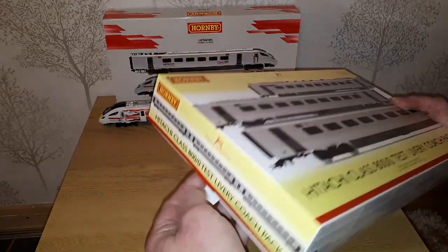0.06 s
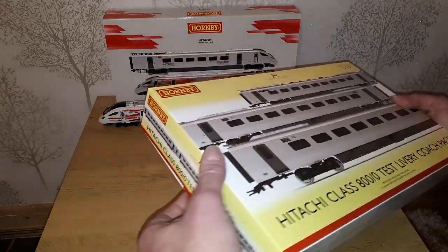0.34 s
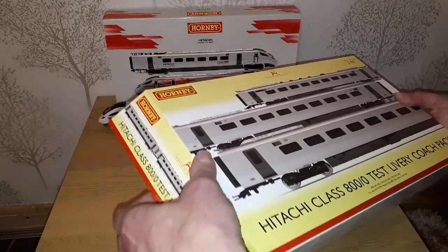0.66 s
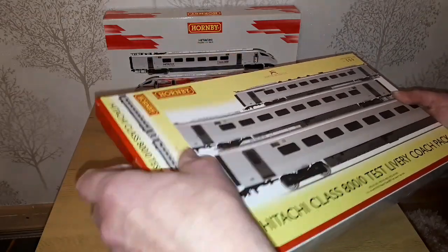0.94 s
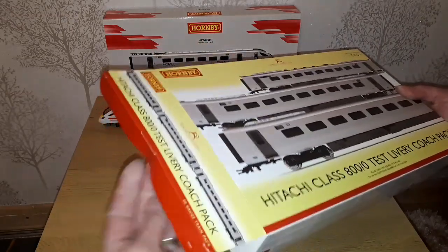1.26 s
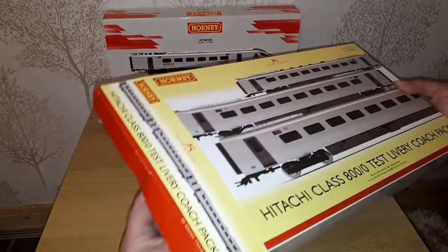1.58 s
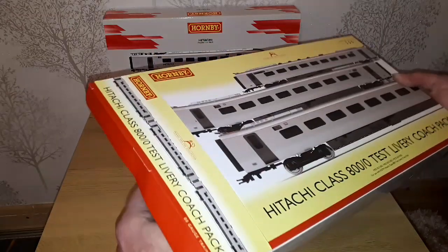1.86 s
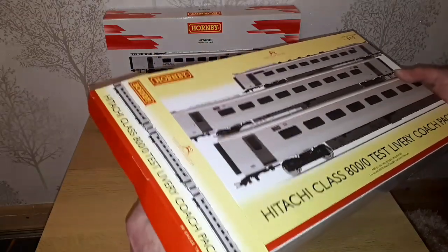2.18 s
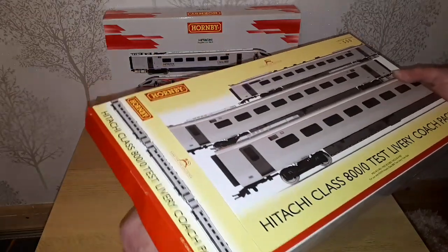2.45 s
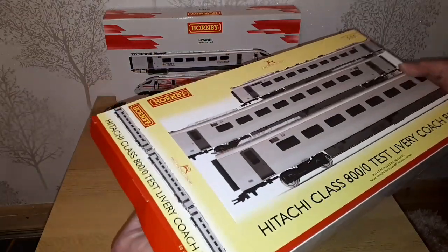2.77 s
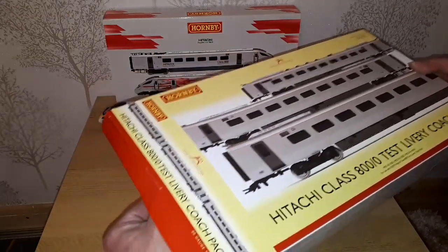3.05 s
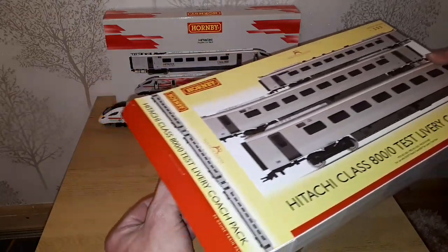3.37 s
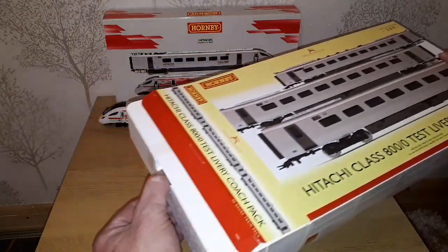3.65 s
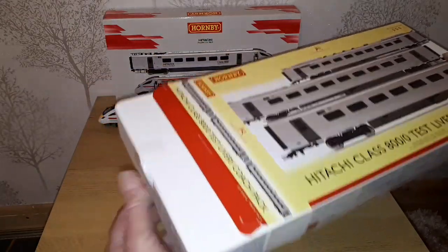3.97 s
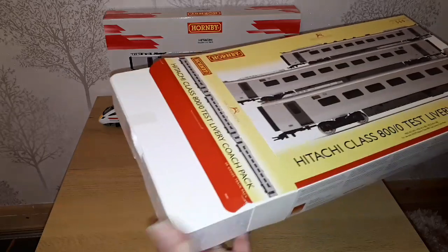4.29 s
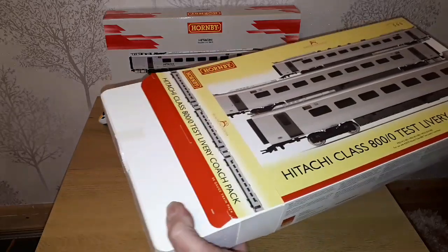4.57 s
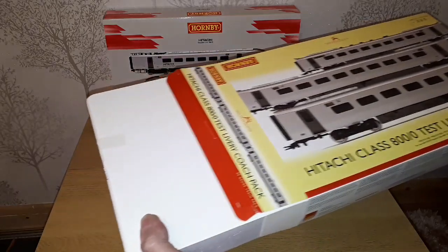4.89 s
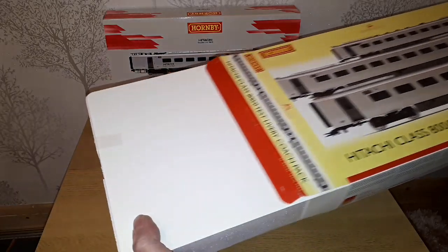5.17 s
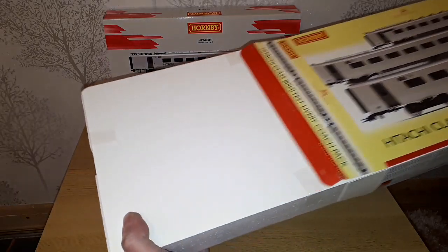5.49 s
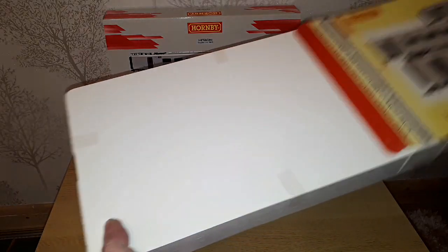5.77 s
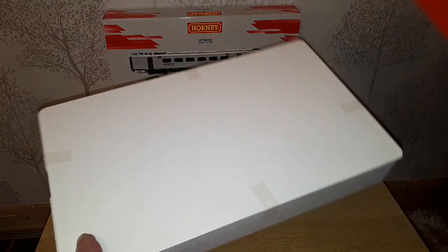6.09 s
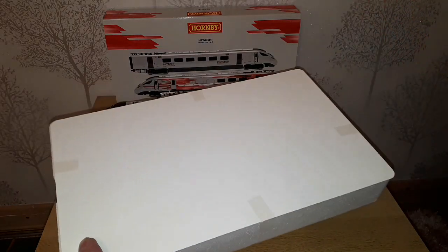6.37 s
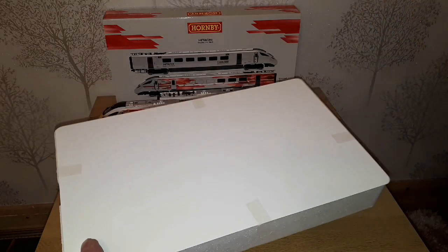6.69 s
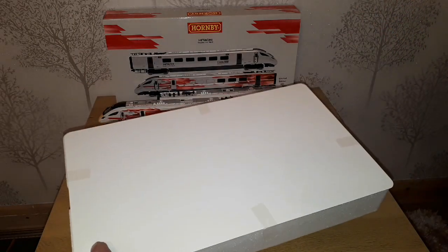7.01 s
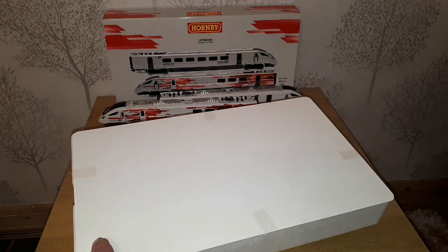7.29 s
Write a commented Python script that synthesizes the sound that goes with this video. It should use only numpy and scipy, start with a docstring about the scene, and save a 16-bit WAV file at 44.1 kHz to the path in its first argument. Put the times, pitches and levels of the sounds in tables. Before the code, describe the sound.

Close to the microphone in a small, quiet room, fingers shift on a cardboard box. Its end flap snaps free with three hollow knocks and rustles as it folds back. A polystyrene tray hisses out in two long pulls with tiny squeaks, split by a brief silence. The tray judders and bumps clear, then the empty sleeve scrapes aside, a little to the right.

```python
"""A table in a small room, a stereo microphone close to a flat cardboard box being opened by hand.
Fingers shift on the card, then the end flap snaps free with three hollow knocks and rubs as it folds back.
A polystyrene tray hisses out of the sleeve in two pulls; between them an edit cut leaves a brief silence.
The tray judders over the lip, bumps clear and flexes in the hand.
Last, a little to the right, the empty sleeve is slid aside."""
import sys
import numpy as np
from scipy import signal
from scipy.fft import rfft, irfft, next_fast_len
from scipy.io import wavfile
from scipy.ndimage import map_coordinates

SR = 44100
rng = np.random.default_rng(int(sys.argv[2]) if len(sys.argv) > 2 else 0)


def wrap_up_sound(samples):
    """Save the sound to the file named by the first command line argument, as 16-bit audio."""
    columns = np.atleast_2d(samples).T
    # keep every value between -1 and 1, then stretch to whole-number steps
    tamed = np.clip(columns, -1, 1)
    steps = np.round(tamed * 32767).astype(np.int16)
    wavfile.write(sys.argv[1], SR, steps)


N = 328192

# The stiff end flap and the sleeve's broad panels ringing.
# Each row: pitch in Hz, relative level in dB, t60 in seconds before extra damping.
FLAP_MODES = [(960, -12, 0.14), (1250, -9, 0.12), (1353, -5.5, 0.049), (1590, 6, 0.063), (1668, -2.5, 0.11),
              (1770, 3, 0.067), (2010, -5, .06), (2310, -9.5, 0.2), (2640, -13.5, 0.048), (3500, -17, .04),
              (3515, -17.5, .04)]
SLEEVE_MODES = [(104, -8.5, 0.22), (140, -4.5, 0.064), (240, 2, 0.039), (290, -0.5, .05), (380, 1, 0.21),
                (463, -1, 0.061)]
# Card fibres tearing. Each row: frequency in Hz, relative level in dB.
CRACK_SPECTRUM = [(290, -30.5), (500, -13.5), (783, -15.5), (944, -18.5), (1390, -11), (1630, -9),
                  (2090, -8.5), (2710, -14.5), (2960, -16), (3620, -15.5), (4000, -19), (7240, -23),
                  (8740, -34), (14300, -36), (15800, -48)]
# The flap snapping, just right of centre. Each row: start in seconds, flap ring in dB, its attack in
# seconds, crack, crunch and thump in dB, thump pitch in Hz, panel swing in dB. Levels are relative.
SNAPS = [(0.6044, -11.5, .0005, -19.5, -33.5, -17.5, 280, -60),
         (0.7851, -6.5, .002, -16, -25, -17.5, 255, -19), (1.134, -25.5, .001, -44, -51, -53, 312, -60),
         (1.299, -8.5, 0.0011, -26.5, -35, -22.5, 255, -23.5),
         (1.383, -26, 0.0022, -34, -40, -33, 237, -34), (1.518, -25.5, .0005, -41.5, -55, -39.5, 121, -58)]

def flap_knocks(give_lead_s=.0046, rebound_s=.026, thump_lag_s=.0042, swing_lag_s=.008):
    """Each snap gives, cracks, rings the flap and rebounds; the sleeve booms and its face swings."""
    out, t = np.zeros((2, N)), np.arange(SR // 6) / SR
    crack_hold_s, crack_t60_s, crunch_t60_s = .0049, .016, .12
    crackle = friction(CRACK_SPECTRUM, alike=.49, grain_db=2.5)
    hardest_db = max(snap[3] for snap in SNAPS)
    for s, flap_db, attack, crack_db, crunch_db, thump_db, thump_hz, swing_db in SNAPS:
        tearing = amp(crack_db - 60 * np.maximum(t - crack_hold_s, 0) / crack_t60_s)
        crumpling = amp(crunch_db - 60 * t / crunch_t60_s)
        edge_hz = 14000 * amp(.7 * (crack_db - hardest_db))  # softer cracks are duller
        for at, loss_db in [(s - give_lead_s, -22), (s, 0), (s + rebound_s, -18)]:
            burst = (tearing + crumpling) * crackle[:, round(at * SR):][:, :len(t)]
            crack = filtered(burst, lambda hz: 1 / np.hypot(1, hz / edge_hz))
            # a broad flap sends a different blend of its modes to each side of the microphone
            flap = np.array([ring(FLAP_MODES, t, attack=attack, damping=1.6) for side in out])
            add(out, at, amp(loss_db) * (crack + amp(flap_db - 5) * flap))
        add(out, s, amp(thump_db - 7) * thud(t, hz=387, rise=.003))  # the snap shoves the end panel
        panels = ring(SLEEVE_MODES, t, attack=.002, damping=1.2)
        boom = amp(-6) * panels + amp(-1) * thud(t, thump_hz, rise=.004)
        add(out, s + thump_lag_s, amp(thump_db) * boom)
        face = ring(SLEEVE_MODES, t, attack=.003, damping=1.2)
        swing = amp(-3.5) * face + thud(t, hz=137.4, rise=.004)
        add(out, s + swing_lag_s, amp(swing_db) * swing)
    out[1] = np.roll(out[1], round(.00007 * SR))  # reaches the right side a shade later
    return placed(out, right_db=2.6)

# Foam on card, its top fizz, the sleeve's hum and its juddering lip.
# Each row: frequency in Hz, relative level in dB.
FOAM_SPECTRUM = [(470, -16.5), (800, -9), (1000, -9.5), (1150, -7), (1820, -5.5), (2290, -3), (3580, -8),
                 (4570, -7), (4950, -9.5), (5820, -7), (7350, -13), (8300, -26), (9000, -32), (11700, -29),
                 (19800, -120)]
FIZZ_SPECTRUM = [(6500, -30), (8200, -1), (11000, 0), (15800, -2.5)]
HUM_SPECTRUM = [(70, -12), (130, -6.5), (210, -15), (300, -2.5), (420, -1.5), (580, -3), (750, -8),
                (1100, -29), (1800, -38)]
LIP_SPECTRUM = [(60, -22), (110, -5), (155, 2), (220, -3), (290, -2), (480, -1), (620, 1), (800, -2),
                (1000, -8), (1500, -8), (3000, -19), (5000, -45), (12000, -70)]
# The tray creeping under small pushes.
# Each row: start and length in seconds, then hiss, hum and fizz in relative dB.
TRAY_NUDGES = [(2.07, 0.56, -56, -58, -86.5), (2.28, 0.088, -62, -63, -76.5),
               (2.66, .15, -51.5, -60, -67.5), (3.91, 0.066, -54, -60, -77), (4.02, .13, -61.5, -69, -73.5),
               (4.29, .08, -65.5, -84, -70.5)]
# Two long pulls, a list for each. Each row: time in seconds, then hiss, hum and fizz in relative dB.
TRAY_PULLS = [
    [(2.87, -61, -74.5, -79), (2.99, -44.5, -59, -62.6), (3.12, -51.5, -65, -65.5), (3.35, -50, -61, -64.0),
     (3.52, -46.5, -55, -61.5), (3.66, -47, -58, -61.5), (3.83, -46, -56, -61.5), (3.9, -60, -61.5, -73.5)],
    [(4.56, -55, -63, -68), (4.65, -56, -60.5, -77.5), (4.75, -46.4, -54, -63.2), (5.0, -48.5, -53, -63.5),
     (5.15, -48.5, -58.5, -63), (5.55, -48.5, -59, -61), (5.7, -47, -57, -57.5), (5.87, -46.5, -52, -53)],
]
# The tray's end jolting over the lip. Each row: start in seconds, judder and scrape in relative dB.
LIP_JOLTS = [(5.888, -36, -47), (5.915, -38.5, -43.5), (5.941, -39, -44.5), (5.962, -44, -48),
             (5.986, -37.5, -45.5)]

def tray_sliding(jolt_hold_s=.016):
    """Foam beads hiss along the card; the sleeve hums at its far end and judders as the tray leaves."""
    nudges = strokes(TRAY_NUDGES, attack=.029, release=.16)
    hiss, hollow, fizz = sum(gains(pull) for pull in TRAY_PULLS) + nudges
    jolts = [(s, jolt_hold_s, *levels_db) for s, *levels_db in LIP_JOLTS]
    judder, scrape = strokes(jolts, attack=.0031, release=.1)
    hiss += scrape
    fizz += amp(-17.5) * scrape
    beads = hiss * friction(FOAM_SPECTRUM, alike=.18, grain_db=1, flutter_db=.46, rate=22, lead=-.00007)
    top = fizz * friction(FIZZ_SPECTRUM, alike=.054, grain_db=.5, flutter_db=1.1, rate=76)
    hum = hollow * friction(HUM_SPECTRUM, alike=.72, grain_db=1, flutter_db=2.1, rate=27, lead=.00034)
    lip = judder * friction(LIP_SPECTRUM, alike=.89, grain_db=2, rate=390, lead=.00012)
    foam = amp(2.5) * placed(beads, right_db=2.5) + amp(4.5) * top
    return foam + amp(-1) * placed(hum, right_db=11.5) + placed(lip, right_db=1)

# Rustling card and the panels under it. Each row: frequency in Hz, relative level in dB.
CARD_SPECTRUM = [(350, -49), (600, -14), (717, -11), (982, -5), (1100, -0.5), (1460, -2.5), (2140, -2),
                 (2460, -2), (3600, -11), (6400, -10), (8190, -26), (10100, -26.5), (15800, -35)]
PANEL_SPECTRUM = [(29, -74.5), (50, -37.5), (135, -1.5), (178, -8), (334, -1), (368, -1.5), (420, -2),
                  (715, -15.5), (900, -20), (1170, -53), (1980, -120)]
# Fingers shifting their hold. Each row: start and length in seconds, rustle and rumble in relative dB.
FINGER_RUBS = [(0.0, 0.027, -59, -50), (0.155, 0.014, -60, -72), (0.25, 0.43, -75.5, -65),
               (0.39, 0.096, -58, -81), (0.55, .05, -67.5, -63), (0.89, 0.018, -56, -56.5),
               (0.965, 0.041, -50.5, -49), (1.07, 0.28, -56.5, -57), (1.13, 0.032, -52, -67),
               (1.87, 0.29, -60, -60)]
# The flap folding back. Each row: time in seconds, rustle and rumble in relative dB.
FLAP_FOLD = [(1.41, -50, -48), (1.438, -54, -64), (1.5, -49.5, -62), (1.522, -41, -42.5),
             (1.558, -46.5, -53), (1.6, -39.5, -34), (1.728, -55.5, -50.5), (1.738, -43, -43),
             (1.86, -77, -72)]

def card_rubbing():
    """Fingers and flap drag unevenly over the card, and the panels rumble with them on the right."""
    rustle, rumble = strokes(FINGER_RUBS, attack=.018, release=.2) + gains(FLAP_FOLD)
    card = rustle * friction(CARD_SPECTRUM, alike=.55, grain_db=.5, flutter_db=1, rate=74, lead=-.00007)
    panel = rumble * friction(PANEL_SPECTRUM, alike=1, grain_db=5, rate=22, lead=-.00007)
    return placed(card, right_db=1.5) + amp(-2) * placed(panel, right_db=9)

# The grit of a short slip. Each row: frequency in Hz, relative level in dB.
SLIP_SPECTRUM = [(150, -12), (250, -4.5), (887, -5), (1570, -14), (1810, -13), (3040, -6), (3940, -4.5),
                 (7360, -5.5), (8610, -17.5), (15800, -22)]
# Catches on the card, right of centre. Each row: peak time in seconds, relative level in dB,
# half length in seconds, squeak against grit in dB, squeak pitch in Hz.
CARD_CATCHES = [(0.068, -57, .003, -3, 1500), (0.778, -53, 0.022, 9, 1400), (1.017, -59, .005, 11, 1590),
                (1.372, -41, .004, -5, 5840), (1.739, -46, 0.003, 4, 1400), (1.902, -51, 0.013, -8, 1040),
                (2.509, -55, 0.012, 7, 2200), (2.773, -40.5, 0.006, -6, 990),
                (2.829, -35.5, 0.002, -10, 970), (3.561, -44, .008, 12.5, 2190),
                (3.574, -44.5, .006, 5, 716), (4.154, -52, 0.012, -9, 2300),
                (4.312, -71.5, 0.033, 13, 4020), (4.35, -56, .007, -16, 4010),
                (4.55, -53, 0.005, -12, 2040), (5.295, -52, .006, 4, 1300), (5.604, -44, .003, 5, 2370),
                (5.887, -36, 0.006, -8, 4070), (5.93, -44, 0.012, 2, 5960)]

def catches(squeak_q=5):
    """Foam and fingers grip the card and slip: a gritty spurt with a narrow squeak in it."""
    out, t = np.zeros((2, N)), np.arange(N) / SR
    grit = friction(SLIP_SPECTRUM, alike=.79, grain_db=2.5, lead=-.00007)
    grip = friction(FOAM_SPECTRUM, alike=.79, grain_db=2.5, lead=-.00007)
    for s, db, half_s, squeak_db, hz in CARD_CATCHES:
        near = slice(*np.searchsorted(t, [s - .1, s + .1]))
        squeak = filtered(grip[:, near], lambda f: 1j * f / (hz * hz - f * f + 1j * f * hz / squeak_q))
        spurt = amp(db) * np.exp(-((t[near] - s) / half_s) ** 2 / 2)
        out[:, near] += spurt * (grit[:, near] + amp(squeak_db) * unit(squeak))
    return placed(out, right_db=6)

# Fingers, tray and sleeve bumping, right of centre. Each row: start in seconds, relative level in dB,
# pitch in Hz, swell in seconds, sleeve boom against the thud in dB.
SOFT_BUMPS = [(0.067, -50.5, 306, 0.0068, -9), (0.668, -34, 316, 0.0032, -13),
              (1.355, -38, 178, 0.0063, -6), (1.59, -38.5, 142, 0.0087, -10),
              (2.502, -41.5, 140, 0.0065, -6), (4.151, -44.5, 145, 0.0036, -2.5),
              (4.547, -53.5, 170, .004, -2.5), (5.895, -22.5, 577, 0.0025, -23),
              (5.903, -36.5, 151, 0.0066, -6), (5.944, -40, 150, 0.0059, -4),
              (5.991, -32.5, 575, 0.0021, -5.5), (6.18, -47.5, 540, 0.0032, -7)]

def bumps():
    """Soft contacts stir only the low panel modes."""
    out, t = np.zeros((2, N)), np.arange(SR // 4) / SR
    for s, db, hz, swell, boom_db in SOFT_BUMPS:
        boom = amp(boom_db) * ring(SLEEVE_MODES, t, attack=.003, damping=1.5)
        add(out, s, amp(db) * (thud(t, hz, swell) + boom))
    return placed(out, right_db=6)

# The empty sleeve's scrape and its hollow body. Each row: frequency in Hz, relative level in dB.
SCRAPE_SPECTRUM = [(600, -34), (1000, -4), (1300, -9), (1750, -0.5), (2450, -1), (3600, -9.5), (4400, -6.5),
                   (5000, -9.5), (6700, -12.5), (8200, -26), (11500, -26), (15800, -31.5)]
BODY_SPECTRUM = [(29, -53), (50, -18), (86, -15), (188, -9.5), (264, -3), (376, -6), (408, 0.5), (449, -1),
                 (514, -7.5), (694, 0), (764, -5), (829, 0), (1000, -13), (1300, -11), (1690, -46),
                 (2860, -120)]
# The sleeve sliding aside. Each row: time in seconds, scrape and hollow body in relative dB.
SLEEVE_DRAG = [(6.885, -53.5, -55), (6.909, -54, -47), (7.081, -49, -49), (7.113, -47.5, -43.5),
               (7.195, -52, -48.5), (7.271, -39, -37.5), (7.327, -55.5, -52.5), (7.393, -56.5, -47.5),
               (7.44, -62, -55.5)]

def sleeve_dragging():
    """The empty sleeve, put down right of the microphone, scrapes along and its hollow body sounds."""
    scrape, hollow = gains(SLEEVE_DRAG)
    grit = scrape * friction(SCRAPE_SPECTRUM, alike=.3, grain_db=1, flutter_db=1, rate=120, lead=.00027)
    body = hollow * friction(BODY_SPECTRUM, alike=.92, grain_db=.5, flutter_db=1.5, rate=180, lead=.00026)
    return amp(2) * placed(grit, right_db=4.5) + amp(1) * placed(body, right_db=5)

# Polystyrene bending. Each row: frequency in Hz, relative level in dB.
FLEX_SPECTRUM = [(40, -7), (80, -4), (170, -4.5), (260, -6.5), (600, -12), (1200, -29.5), (4000, -42),
                 (10000, -70)]
# The free tray, well to the right. Each row: start and length in seconds, relative level in dB.
TRAY_FLEXES = [(6.05, .45, -62), (6.55, .06, -60.5), (6.705, .03, -70)]

def tray_flexing():
    """The free tray flexes in the hand with a faint, low rumble."""
    bending = strokes(TRAY_FLEXES, attack=.011, release=.22)
    rumble = friction(FLEX_SPECTRUM, alike=.9, grain_db=2, flutter_db=2.4, rate=30)
    return placed(bending * rumble, right_db=9)

# The small room around the table. Each row: frequency in Hz, t60 in seconds.
ROOM_DECAY = [(100, 0.18), (400, 0.41), (1600, 0.34), (6000, 0.37), (15000, 0.26)]

def room(x, delay_s=.0055):
    """The walls answer each side of the microphone differently; each frequency dies at its own speed."""
    hz, t, spectra = signal.stft(diffuse(size=SR // 2), SR, nperseg=256)
    decay = amp(-60 * t / along(ROOM_DECAY, hz)[:, None])
    _, tail = signal.istft(spectra * decay, SR, nperseg=256)
    tail = np.pad(tail / np.linalg.norm(tail[0]), ((0, 0), (round(delay_s * SR), 0)))
    return signal.fftconvolve(x, tail, axes=1)[:, :N]

# The quiet room at the microphone. Each row: frequency in Hz, relative level in dB.
ROOM_TONE_SPECTRUM = [(25, -8), (60, -7), (100, 0), (200, -7), (450, -10), (1000, -16), (2000, -18),
                      (4000, -23), (6300, -21), (8200, -30), (15800, -32)]

def room_tone():
    """A faint, steady background, strongest in the bass."""
    return amp(-68) * coloured(diffuse(size=N), ROOM_TONE_SPECTRUM)

def diffuse(size, alike_hz=450):
    """Noise from all around: alike in both channels in the bass, unrelated in the treble."""
    mid, side = rng.standard_normal((2, size))
    side = filtered(side, lambda hz: hz / np.hypot(hz, alike_hz))
    return np.array([mid + side, mid - side])

def friction(spectrum, alike, grain_db, flutter_db=3, rate=60, lead=0):
    """Countless tiny slips in clumps; the share `alike` reaches both sides, the right `lead` s earlier."""
    slips = rng.standard_normal((3, N)) * amp(grain_db * wobble(1500) + flutter_db * wobble(rate))
    direct = np.array([np.roll(slips[2], round(lead * SR)), slips[2]])
    return coloured(np.sqrt(alike) * direct + np.sqrt(1 - alike) * slips[:2], spectrum)

def ring(modes, t, attack, damping):
    """Damped modes struck at slightly new strengths and phases, peak 1."""
    chance = rng.standard_normal((len(modes), 2)) * [1.5, .5]
    y = np.zeros_like(t)
    for k, ((hz, db, t60), (extra_db, phase)) in enumerate(zip(modes, chance)):
        decay = amp(db + extra_db - 60 * t * damping / t60)
        y += (-1) ** k * decay * np.sin(2 * np.pi * hz * t + phase)
    y *= 1 - np.exp(-t / attack)
    return y / np.abs(y).max()

def thud(t, hz, rise):
    """One heavily damped panel mode that swells for `rise` seconds and dies."""
    return t / rise * np.exp(1 - t / rise) * np.sin(2 * np.pi * hz * t)

def strokes(rows, attack, release):
    """A gain curve per dB column: each stroke rises, holds, then falls 60 dB in `release` seconds."""
    out, t = np.zeros((len(rows[0]) - 2, N)), np.arange(SR) / SR
    for s, length, *levels_db in rows:
        shape = np.minimum(t / attack, 1) * amp(-60 * np.maximum(t - length, 0) / release)
        add(out, s, amp(levels_db)[:, None] * shape)
    return out

def gains(rows):
    """A gain curve per dB column, gliding from row to row and fading quickly beyond the ends."""
    s, *columns = np.transpose(rows)
    t = np.arange(N) / SR
    gate = np.clip(1 + np.minimum(t - s[0], s[-1] - t) / .012, 0, 1)
    return np.array([gate * amp(np.interp(t, s, db)) for db in columns])

def wobble(rate):
    """A smooth random curve, `rate` knots a second."""
    knots = rng.standard_normal(int(N * rate / SR) + 4)
    return map_coordinates(knots, [np.arange(N) * rate / SR])

def coloured(x, spectrum):
    """x given a spectrum that falls away below its first point, at rms 1."""
    low_hz = spectrum[0][0]
    return unit(filtered(x, lambda hz: amp(along(spectrum, hz)) * np.minimum(hz / low_hz, 1) ** 2))

def filtered(x, response):
    """x through a frequency response."""
    n = x.shape[-1]
    padded = next_fast_len(n + 8192)
    return irfft(rfft(x, padded) * response(np.fft.rfftfreq(padded, 1 / SR)), padded)[..., :n]

def along(points, hz):
    """(Hz, value) points read on a log axis."""
    freqs, values = np.transpose(points)
    return np.interp(np.log(hz + 1), np.log(freqs + 1), values)

def placed(pair, right_db):
    """A stereo pair leaning to the right."""
    return pair * amp([[-right_db / 2], [right_db / 2]])

def add(track, s, sound):
    """Mixes a sound into the track at s seconds."""
    part = track[..., round(s * SR):][..., :sound.shape[-1]]
    part += sound[..., :part.shape[-1]]

def amp(db):
    """Decibels to gain."""
    return 10 ** (np.asarray(db) / 20)

def unit(x):
    """Scaled to rms 1."""
    return x / np.sqrt(np.mean(x ** 2) + 1e-20)

def scene(panel_low_hz=78):
    """Blows and friction close by, the walls behind them, room tone underneath."""
    # the light panels radiate little deep bass
    bass_cut = signal.butter(2, panel_low_hz, "high", fs=SR, output="sos")
    blows = signal.sosfilt(bass_cut, flap_knocks() + bumps())
    rubs = card_rubbing() + tray_flexing() + tray_sliding() + catches() + sleeve_dragging()
    return blows + rubs + room_tone() + room(amp(-7.5) * blows + amp(-9) * rubs)

def record(dry, low_hz=45, top_hz=15850, edit_cut_s=(4.362, 4.544)):
    """The microphone thins the deep bass; an edit cut leaves a brief silence. Treble ends at top_hz."""
    t = np.arange(N) / SR
    outside_cut = (t < edit_cut_s[0]) | (t > edit_cut_s[1])
    thinned = signal.sosfilt(signal.butter(1, low_hz, "high", fs=SR, output="sos"), dry)
    return filtered(thinned * outside_cut, lambda hz: hz < top_hz)

dry = scene()
out = record(dry)
wrap_up_sound(out)
```